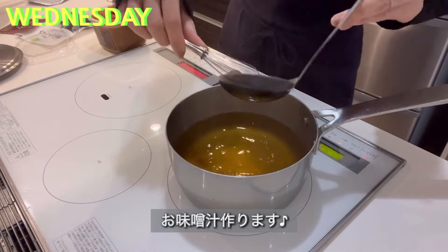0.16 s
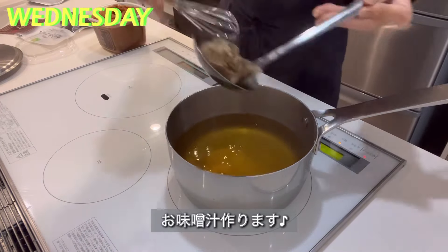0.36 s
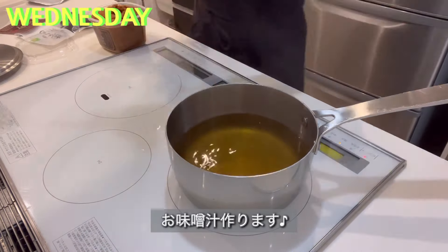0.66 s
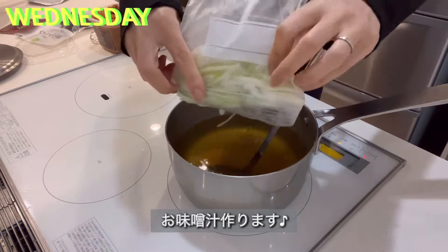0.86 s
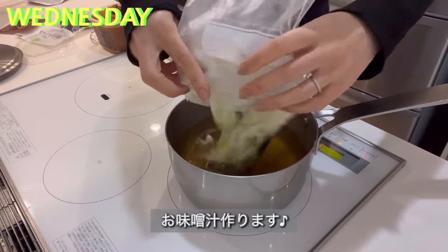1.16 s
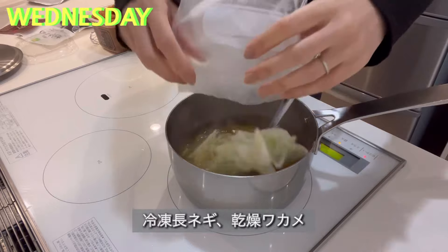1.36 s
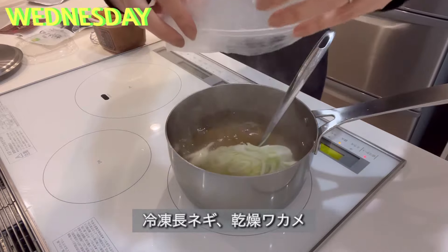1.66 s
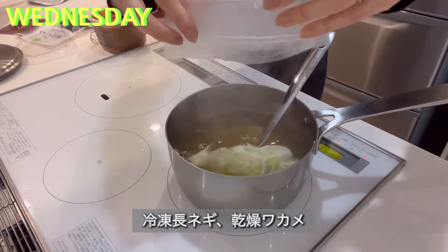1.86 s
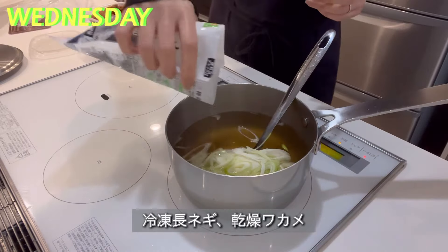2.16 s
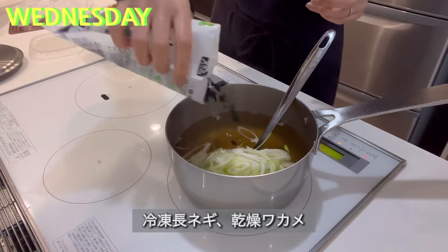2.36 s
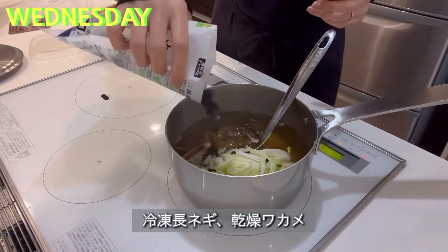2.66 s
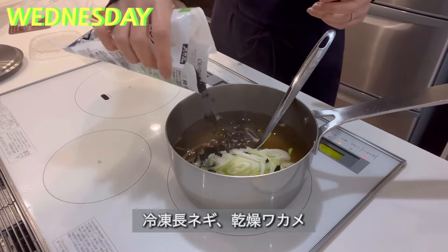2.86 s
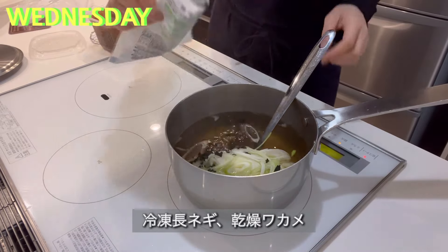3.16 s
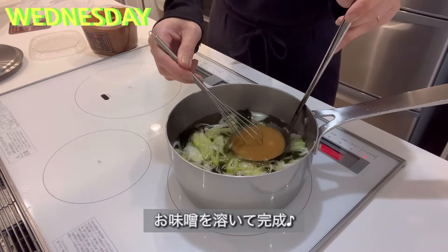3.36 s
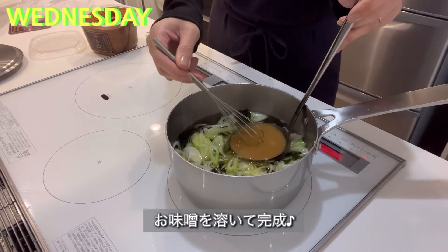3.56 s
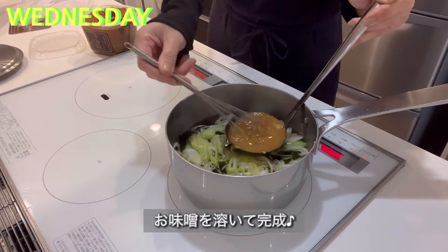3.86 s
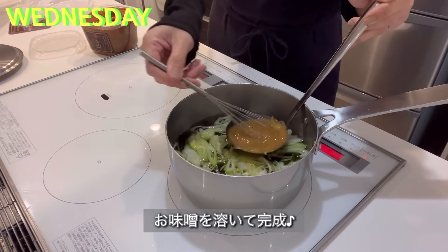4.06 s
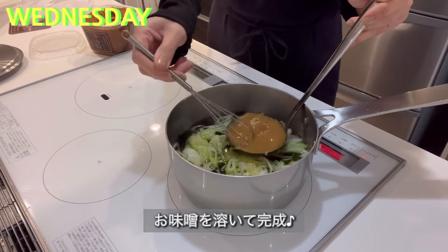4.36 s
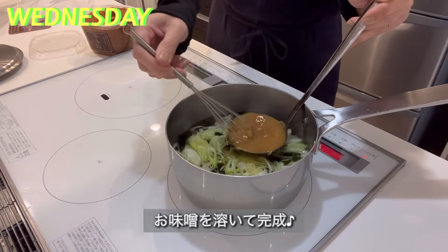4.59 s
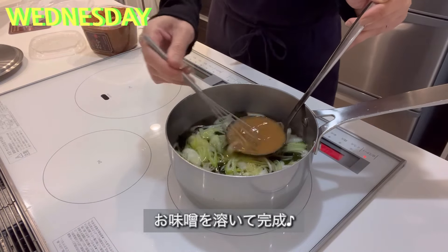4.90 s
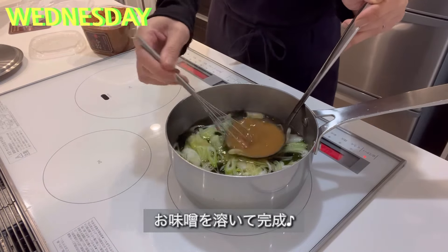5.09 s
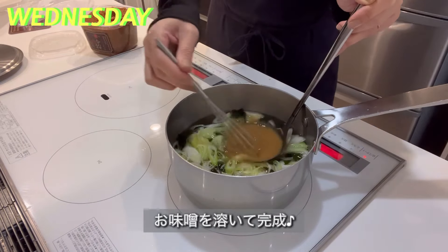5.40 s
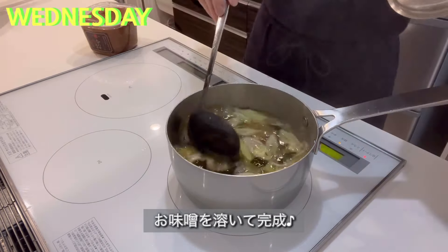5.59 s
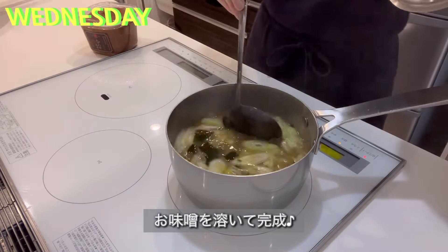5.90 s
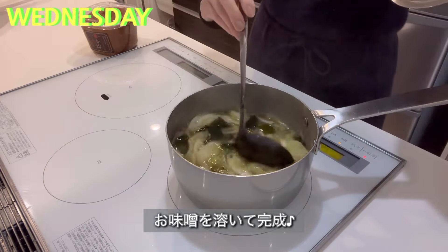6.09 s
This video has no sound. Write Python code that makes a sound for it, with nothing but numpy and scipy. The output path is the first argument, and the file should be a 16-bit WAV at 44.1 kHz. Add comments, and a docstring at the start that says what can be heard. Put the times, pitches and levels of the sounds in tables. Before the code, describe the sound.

In a home kitchen, an extractor fan roars and hot broth hisses faintly. A whisk clinks and scrapes on a ladle. A plastic bag crackles until a frozen block thuds into the pot, splashing and making the ladle clatter loudly. A stiff packet rustles and is shaken, then the fan grows louder and the whisk ticks lightly in the broth. The sounds are close, and the background jumps in level several times.

```python
"""Cooking under a roaring extractor fan, with hot broth hissing faintly. First a whisk clinks and scrapes
on a ladle. Then a plastic bag crackles as its folds snap, until a frozen block slides out, thuds into
the pot, splashes and sets the ladle clattering. Next a stiff packet rustles and is shaken. Last, the
whisk ticks in the broth while a deep drone comes and goes.
Along the way the scene cuts abruptly four times, and the background changes level at the cuts."""
import sys
import numpy as np
from scipy import signal
from scipy.fft import rfft, irfft
from scipy.io import wavfile
from scipy.ndimage import uniform_filter1d

SR = 44100
rng = np.random.default_rng(int(sys.argv[2]) if len(sys.argv) > 2 else 0)


def unload_wav(signal):
    """Save mono or channel-first audio to the path in sys.argv[1] as 16-bit WAV at rate SR, clipped to [-1, 1]."""
    wavfile.write(
        sys.argv[1],
        SR,
        np.round(np.clip(np.atleast_2d(signal).T, -1, 1) * 32767).astype(np.int16),
    )


N = 275184
WOBBLE = .005  # how much rubbing blurs a metal tone, as a share of its pitch


def undb(db):
    """Turn decibels into a gain."""
    return 10 ** (np.asarray(db) / 20)


def unit(x):
    """Scale a signal to an average (rms) level of 1."""
    return x / np.sqrt(np.mean(x ** 2))


def over_hz(table):
    """Spread a table's columns over all frequencies, one curve each."""
    hz, *columns = np.transpose(table)
    return [np.interp(np.log(np.fft.rfftfreq(N, 1 / SR) + 1), np.log(hz), c) for c in columns]


def colour(x, db):
    """Shape the tone with a decibel curve, then scale to level 1."""
    return unit(irfft(rfft(x) * undb(db), N))


def walk(rate_hz):
    """A smooth random drift, about 1 in size."""
    hold = int(SR / rate_hz)
    steps = np.repeat(rng.standard_normal(N // hold + 1), hold)
    return unit(uniform_filter1d(uniform_filter1d(steps, hold), hold)[:N])


def band_noise(low_hz, high_hz):
    """Two channels of noise between two frequencies."""
    band = signal.butter(2, [low_hz, high_hz], "band", fs=SR, output="sos")
    return unit(signal.sosfilt(band, rng.standard_normal((2, N))))


def grains(n, density, spread_db):
    """Random clicks of uneven size; each channel gives them its own signs."""
    chance = rng.random((n, 4))
    size = (chance[:, 0] < density) * undb(-spread_db * np.log(chance[:, 1] + 1e-9))
    return unit(size * np.sign(chance[:, 2:].T - .5))


def bursts(rows, octaves, density):
    """Swarms of clicks that swell and fade, reaching `octaves` either side of their pitch."""
    out, lead = np.zeros((2, N + SR)), SR // 20
    ms = (np.arange(4 * lead) - lead) / SR * 1000
    for peak_s, db, hz, swell_ms, fade_ms in rows:
        band = signal.butter(2, [hz / 2 ** octaves, min(hz * 2 ** octaves, 16000)], "band", fs=SR)
        shape = np.exp(np.where(ms < 0, ms / swell_ms, -ms / fade_ms))
        swarm = signal.lfilter(*band, grains(len(ms), density, 1.8) * shape)
        at = int(peak_s * SR) - lead
        out[:, at:at + len(ms)] += undb(db) * unit(swarm) * np.sqrt(np.mean(shape ** 2))
    return out[:, :N]


def swells(rows, rise_db_s, fall_db_s):
    """A gain that rises, holds and dies away for each row, never crossing a cut."""
    t, edges = np.arange(N) / SR, [row[0] for row in STRETCHES]
    stretch = np.searchsorted(edges, t, "right")
    gain = np.zeros(N)
    for start, end, db in rows:
        level_db = db - rise_db_s * np.maximum(start - t, 0) - fall_db_s * np.maximum(t - end, 0)
        gain = np.maximum(gain, (stretch == np.searchsorted(edges, end)) * undb(level_db))
    return gain


def ring(push, tones, scatter_db, wobble):
    """A pushed object rings: each tone takes a drifting share of the push and dies 60 dB in ring_s."""
    out, end = np.zeros((2, N)), 2 * SR  # only the scene's first two seconds ring
    for hz, db, ring_s in tones:
        pole = np.exp(2j * np.pi * hz / SR - np.log(1000) / (ring_s * SR))
        share = undb(scatter_db * walk(39.8)[:end])
        waver = np.exp(1j * np.sqrt(2 * np.pi * wobble * hz / SR) * np.cumsum(rng.standard_normal(end)))
        tone = signal.lfilter([1], [1, -pole], push[:, :end] * share + 1e-18)
        out[:, :end] += undb(db) * (waver * tone).imag
    return out / np.sqrt(np.sum(undb(np.array(tones)[:, 1]) ** 2))


def struck(hits, tones, crack_hz, crack_ms, chatter_ms):
    """Metal hits metal: the contact cracks, and the blow and a brief chatter set it ringing."""
    push = bursts([(s, db - 14, 5000, .1, chatter_ms) for s, _, db in hits], 2.1, .072)
    for s, _, db in hits:
        push[:, int(s * SR)] += undb(db)
    ringing = ring(push, tones, scatter_db=4.4, wobble=WOBBLE)
    return ringing + bursts([(s, db, crack_hz, .15, crack_ms) for s, db, _ in hits], 1.1, .47)


def kitchen_echo(ring_s=.32, echo_db=-8):
    """The direct sound arrives first, then a duller tail bounces off the walls."""
    t = np.arange(SR // 2) / SR
    tail = signal.lfilter([1], [1, -.35], rng.standard_normal((2, len(t))))
    tail *= np.exp(-np.log(1000) * t / ring_s)
    paths = undb(echo_db) * tail / np.sqrt(np.sum(tail ** 2, axis=1, keepdims=True))
    paths[:, 0] = 1
    return paths


# When the drone holds: start_s, end_s, level_db
DRONE_TIMES = [(4.62, 5.05, -50)]
def drone():
    """A very deep drone comes and goes."""
    return swells(DRONE_TIMES, rise_db_s=60, fall_db_s=40) * band_noise(45, 49)


# Tone of the hot broth: pitch_hz, relative_db
SIMMER_TONE = [(1200, -9.5), (2500, 0.5), (4300, 0), (5500, 2), (6600, -0.5), (8000, 4.5), (11200, 0),
               (13000, -5.5)]
def simmer():
    """Hot broth gives a fine hiss with a slight prickle."""
    return undb(1.1 * walk(12)) * colour(grains(N, .16, 2), over_hz(SIMMER_TONE)[0])


# Tone of the rushing air: pitch_hz, relative_db
FAN_TONE = [(25, -17), (90, 4), (233, -5), (408, -7.5), (758, -18), (992, -25.5), (1560, -32), (3500, -46),
            (4550, -70.5), (7700, -120)]
# Pitches that hood and kitchen boost: pitch_hz, width_hz, boost_db
HOOD_PEAKS = [(100.5, 10, 6), (438, 55, 8.5), (668.7, 13, 9), (987, 57, 11.5), (1350, 100, 7.5),
              (1565, 130, 10)]
def fan():
    """Air roars through the hood, wavering a little."""
    hz = np.fft.rfftfreq(N, 1 / SR)
    peaks_db = sum(boost / (1 + (2 * (hz - pitch) / width) ** 2) for pitch, width, boost in HOOD_PEAKS)
    db = over_hz(FAN_TONE)[0] + peaks_db
    return undb(.58 * walk(6.9)) * np.array([colour(rng.standard_normal(N), db) for _ in range(2)])


# Whisk touching ladle under the broth: peak_s, level_db, pitch_hz
WHISK_TICKS = [(4.623, -42.5, 11500), (4.794, -48.5, 9400), (4.873, -50, 10500), (4.89, -48, 6550),
               (5.0248, -48, 11000), (5.0715, -36.5, 9100), (5.274, -46, 10000), (5.62, -53, 2670)]
# Wires knocking: peak_s, level_db, pitch_hz
WIRE_PINGS = [(4.622, -50.5, 3940), (4.887, -43, 1670), (4.891, -43.5, 2330)]
def whisk_in_broth():
    """Light touches make short ticks; knocking wires ping with a clearer pitch."""
    ticks = bursts([(s, db, hz, .4, 4.5) for s, db, hz in WHISK_TICKS], octaves=.46, density=.31)
    pings = bursts([(s, db, hz, .8, 7) for s, db, hz in WIRE_PINGS], octaves=.17, density=.36)
    return ticks + pings


# The ladle's own tones: pitch_hz, relative_db, ring_s
LADLE_TONES = [(3533, 1, 0.045), (5000, -13, .04), (5920, -2.5, 0.053), (6570, 0, 0.052), (7450, 6, 0.037),
               (8670, 2, .05), (9900, 2.5, 0.037), (10500, 0.5, 0.041), (10920, 1, 0.035),
               (12200, -14, 0.031), (13200, -3, 0.033)]
# Whisk hitting ladle: start_s, crack_db, ring_db
WHISK_HITS = [(0.105, -47, -49), (0.159, -39, -62), (0.3661, -33, -51.5)]
def whisk_clinks():
    """Thin wires tap the ladle and it rings brightly."""
    return struck(WHISK_HITS, LADLE_TONES, crack_hz=15600, crack_ms=3, chatter_ms=4.1)


# Whisk drawn over the ladle: start_s, end_s, level_db
WHISK_STROKE = [(.225, .325, -53)]
def whisk_scrape():
    """Wires stutter over the ladle and keep it singing, in one stroke and a skid after each hit."""
    wires = grains(N, .18, 3) * undb(2.5 * walk(81))
    singing = undb(-17.5) * ring(wires, LADLE_TONES[2:], scatter_db=4.2, wobble=WOBBLE)
    bright = signal.lfilter([1, -1.3, .42], [1], singing + wires)  # light wires favour the high tones
    skids = swells([(s, s + .012, db - 18.5) for s, db, _ in WHISK_HITS], rise_db_s=1e4, fall_db_s=500)
    return np.maximum(skids, swells(WHISK_STROKE, rise_db_s=192, fall_db_s=801)) * bright


# Hands on the bag and on the packet: start_s, end_s, level_db
BAG_HANDLING = [(.71, .83, -39), (.9, 1.07, -33.5), (1.17, 1.2, -34), (1.38, 1.46, -46)]
PACKET_HANDLING = [(1.91, 2.53, -35.5), (2.6, 2.72, -37.5), (3.13, 3.2, -43.5)]
# Tone of the thin bag and of the stiff packet: pitch_hz, relative_db
BAG_TONE = [(250, -3), (600, 5.5), (1400, 5), (3200, 1.5), (5500, -1.5), (8000, -3), (10500, -2),
            (14000, -7)]
PACKET_TONE = [(250, -1.5), (600, -2), (1400, -1.5), (3000, 0), (5500, -5), (8000, -3.5), (10500, -4),
               (14000, -7.5)]
def rustle():
    """Countless tiny creases click in uneven fits as bag and packet are handled."""
    pop_samples = SR // 500  # about 55 times a second, creases stand out for 2 ms
    pops = uniform_filter1d((rng.random(N) < 55 / SR) * float(pop_samples), pop_samples)
    creases = grains(N, .13, .92) * (1 + .84 * pops)
    out = np.zeros((2, N))
    for handling, tone, fits_db in [(BAG_HANDLING, BAG_TONE, 3.5), (PACKET_HANDLING, PACKET_TONE, 2.2)]:
        crinkle = colour(creases * undb(fits_db * walk(45.11)), over_hz(tone)[0])
        out += swells(handling, rise_db_s=126, fall_db_s=189.5) * crinkle
    return out


# Jerks of the packet: peak_s, level_db, fade_ms
PACKET_JERKS = [(2.262, -26, 8.4), (2.434, -26.5, 12)]
def packet_shakes(wall_hz=3080):
    """Each jerk makes the packet's stiff walls sound around one pitch."""
    return bursts([(s, db, wall_hz, .84 * ms, ms) for s, db, ms in PACKET_JERKS], .42, .11)


# Single folds of plastic: peak_s, level_db, pitch_hz, half_width_octaves
FOLD_SNAPS = [(0.725, -32, 3500, 1.6), (0.771, -22, 6440, 1.1), (0.7915, -16.5, 10500, 0.58),
              (0.803, -23, 2200, 1.4), (0.892, -11.5, 2400, 2.6), (.952, -22, 8000, 0.81),
              (0.957, -20.5, 6000, 0.84), (0.983, -23, 10000, .4), (1.358, -38, 7000, 1),
              (1.423, -23, 10300, 0.2), (1.4248, -30.5, 5640, 0.27), (1.4574, -35, 3500, .7),
              (1.489, -39, 3547, 0.62), (1.856, -50, 3200, .6), (1.91, -29, 4900, 0.6),
              (2.258, -23.5, 2800, 1.2), (2.57, -22, 10500, 0.54), (2.862, -46, 8860, 1.6),
              (3.071, -39.5, 2800, 0.28)]
def snaps():
    """A fold gives way with a sharp snap."""
    return sum(bursts([(s, db, hz, .25, 2.6)], octaves, .3) for s, db, hz, octaves in FOLD_SNAPS)


# Handfuls of plastic: peak_s, level_db, pitch_hz, fade_ms
FOLD_CRUNCHES = [(.864, -27, 6500, 7), (.997, -20.5, 5950, 21), (1.013, -22, 2670, 13.3),
                 (1.031, -22.5, 8000, 6.3), (2.51, -31.5, 1850, 25), (2.805, -39, 12000, 6),
                 (3.203, -37, 3600, 14)]
def crunches():
    """Many folds crushed together make a crunch that swells and fades."""
    return bursts([(s, db, hz, .51 * ms, ms) for s, db, hz, ms in FOLD_CRUNCHES], 1.3, .11)


# Contents knocking inside bag and packet: start_s, level_db, pitch_hz
CONTENT_KNOCKS = [(0.791, -31.5, 91), (.891, -29.5, 318), (.999, -26, 252), (2.093, -28, 274),
                  (2.255, -27.5, 274), (2.428, -30.5, 340)]
def thumps(ring_s=.05):
    """Each soft knock rings one hollow note, with a muffled slap above it."""
    notes, t = np.zeros(N), np.arange(SR // 3) / SR
    fade = np.exp(-np.log(1000) * t / ring_s)
    for s, db, hz in CONTENT_KNOCKS:
        at = int(s * SR)
        notes[at:at + len(t)] += undb(db) * np.sin(2 * np.pi * hz * t) * fade
    return notes + bursts([(s, db - 1, 3.02 * hz, 1.5, 8.4) for s, db, hz in CONTENT_KNOCKS], .9, .52)


# The block leaving the bag: start_s, end_s, level_db
SLIDE_TIMES = [(1.2, 1.22, -36)]
def block_slide():
    """The frozen block slides out with a low rumble."""
    return swells(SLIDE_TIMES, rise_db_s=25.5, fall_db_s=49.5) * band_noise(64, 400)


# Broth thrown up: peak_s, level_db, pitch_hz, swell_ms, fade_ms
BROTH_SPRAY = [(1.222, -23, 3560, 6.6, 42)]
def splash():
    """The block throws up a short spray of broth."""
    return bursts(BROTH_SPRAY, octaves=1.1, density=.18)


# Tones of ladle against pot: pitch_hz, relative_db, ring_s
CLATTER_TONES = [(1006.4, 0, 0.13), (1520, -5.5, 0.036), (2650, -8, 0.08), (3230, -9, 0.059),
                 (4080, -5, 0.092), (4220, -7, 0.09), (4590, -9, 0.055), (5620, -5.5, 0.05),
                 (5840, 1.5, 0.051), (6140, -1.5, 0.072), (7600, 0.5, .04), (7930, 6.5, 0.045),
                 (8340, -1.5, 0.037), (9120, -4, .035), (10640, -4, 0.03), (11270, -2, 0.03)]
# Ladle hitting pot: start_s, crack_db, ring_db
CLATTER_HITS = [(1.1883, -24.5, -25.5), (1.2068, -14.5, -17.5), (1.2214, -20.5, -22), (1.2327, -26, -29),
                (1.2503, -27.5, -29)]
def ladle_clatter():
    """The jolted ladle rattles against the pot."""
    return struck(CLATTER_HITS, CLATTER_TONES, crack_hz=4500, crack_ms=3.8, chatter_ms=9)


# Low tones of the full pot on the hob: pitch_hz, relative_db, ring_s
FULL_POT_TONES = [(134, -2.5, 0.17), (194, -3, 0.05), (427, -6.5, 0.079), (476.4, 3.5, 0.11),
                  (644.4, 2.5, 0.085)]
# The block landing in the pot: start_s, level_db, contact_ms
BLOCK_BOUNCES = [(1.198, -12, 3.5), (1.21, -13.5, 1.7), (1.227, -14, 0.95), (1.244, -18, 1.5),
                 (1.315, -24.5, 4.3)]
def block_drop():
    """Each bounce pushes the full pot; a longer contact favours lower tones and slaps duller."""
    push = np.zeros((2, N))
    for s, db, ms in BLOCK_BOUNCES:
        at, length = int(s * SR), int(ms * SR / 500)
        bump = np.sin(np.linspace(0, 2 * np.pi, length))  # a push, then an equal swing back
        push[:, at:at + length] += undb(db) * 2 * bump / length
    slaps = bursts([(s, db - 14, 1500 / ms, 1.5, 8.4) for s, db, ms in BLOCK_BOUNCES], .81, .34)
    return ring(push, FULL_POT_TONES, scatter_db=4, wobble=0) + slaps


# Stretches between the cuts: start_s, fan_db, bass_boost_db, simmer_db
STRETCHES = [(0, -46.5, 2.5, -74.5), (0.706, -46, 5, -67.5), (1.9068, -46, 3, -67.5),
             (3.209, -37, -4, -58.5), (5.473, -48, 3.5, -78.5)]
def scene():
    """The cooking echoes in the kitchen over fan and broth; each stretch is cut off at the next."""
    cooking = (whisk_in_broth() + whisk_clinks() + whisk_scrape() + ladle_clatter() + rustle()
               + block_slide() + snaps() + packet_shakes() + crunches() + thumps()
               + block_drop() + splash())
    air, broth, echo = fan(), simmer(), kitchen_echo()
    bass = signal.filtfilt(*signal.butter(2, 179, fs=SR), air)
    out = drone() + undb(-81) * band_noise(9300, 13000)  # a very faint high hiss throughout
    edges = [int(row[0] * SR) for row in STRETCHES] + [N]
    for a, b, (_, fan_db, bass_db, simmer_db) in zip(edges, edges[1:], STRETCHES):
        heard = signal.fftconvolve(cooking[:, a:b], echo, axes=1)[:, :b - a]
        roar = air[:, a:b] + (undb(bass_db) - 1) * bass[:, a:b]
        out[:, a:b] += heard + undb(fan_db) * roar + undb(simmer_db) * broth[:, a:b]
    return out


# The microphone pair: pitch_hz, likeness (0 to 1), right_lead_half_turns, left_minus_right_db
MIC_PAIR = [(100, .98, 0, -2.8), (350, .9, 0, -2.5), (800, .3, -.6, -1.5), (1500, .4, .15, 1.2),
            (3000, .3, .4, -3), (5300, .25, 0, -3.5), (7800, .75, -1.03, -1.1), (10000, .8, -1.6, 0),
            (11000, .98, -2, 0), (12900, .97, -2, 0), (13800, .6, -2.8, 0)]
def record(dry):
    """Two microphones blend and shift the channels, pitch by pitch, and lose the highest treble."""
    likeness, half_turns, pan_db = over_hz(MIC_PAIR)
    blend = np.arcsin(np.clip(likeness, 0, 1)) / 2
    khz_over_top = np.clip(np.fft.rfftfreq(N, 1 / SR) - 13600, 0, 2500) / 1000
    a, b = rfft(dry) * undb(-24 * khz_over_top)
    shift = np.exp(.5j * np.pi * half_turns) / undb(pan_db / 2)
    left = (np.cos(blend) * a + np.sin(blend) * b) / shift
    right = (np.sin(blend) * a + np.cos(blend) * b) * shift
    treble_cut = signal.ellip(10, .2, 80, 15800, fs=SR, output="sos")
    return signal.sosfilt(treble_cut, irfft([left, right], N))


dry = scene()
out = record(dry)
unload_wav(out)
```